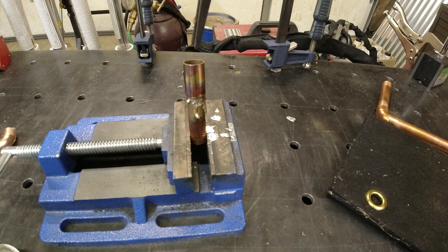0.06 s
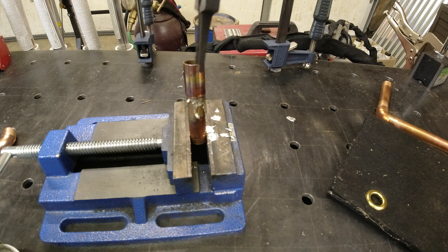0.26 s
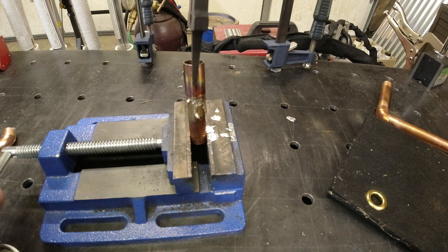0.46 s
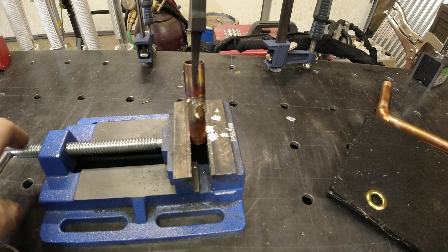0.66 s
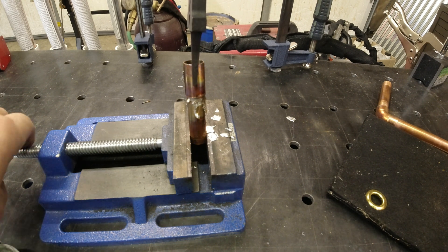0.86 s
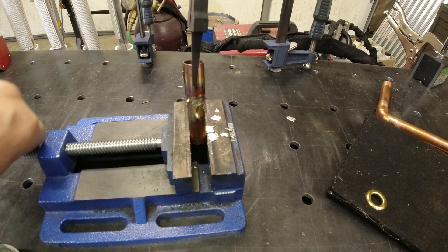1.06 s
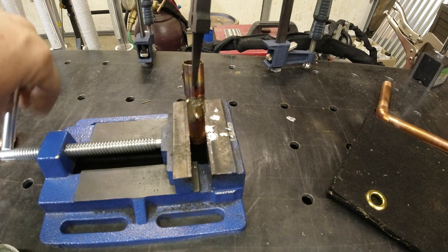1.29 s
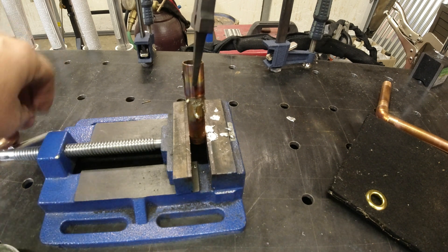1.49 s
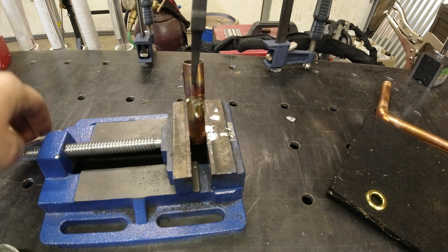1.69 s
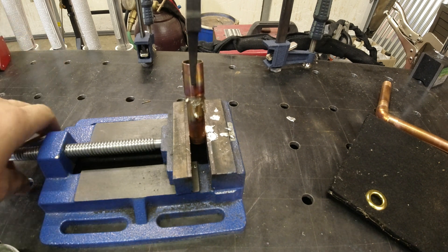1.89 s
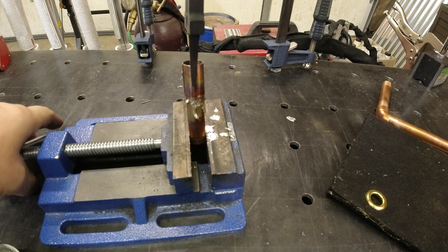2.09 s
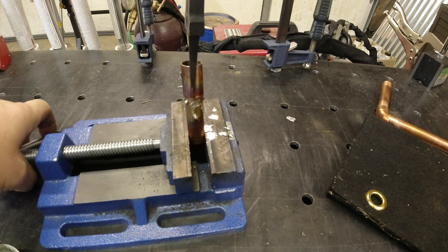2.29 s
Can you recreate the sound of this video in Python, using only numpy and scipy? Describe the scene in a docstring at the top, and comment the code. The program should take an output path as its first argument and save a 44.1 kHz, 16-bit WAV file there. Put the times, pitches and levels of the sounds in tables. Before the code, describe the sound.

One loud metal clank from a vise handle, amid faint rubbing and taps.

```python
"""A small steel vise is tightened in a workshop, heard by one microphone just above the bench. A deep rumble
swells and fades beneath it all, and the hand finds the handle with a tick. The screw rubs as it turns and
knocks twice near one second. At 1.56 s the sliding handle drops against its stop with one loud clank that rings
in the vise, thumps the bench and fills the room. More rubbing and two light taps follow as the ring dies."""
import sys
import numpy as np
from scipy import signal
from scipy.fft import rfft, irfft
from scipy.io import wavfile
from scipy.ndimage import uniform_filter1d

SR = 44100
rng = np.random.default_rng(int(sys.argv[2]) if len(sys.argv) > 2 else 0)


def put_to_file(sound):
    """Save the sound as 16-bit audio at rate SR, in the file named by the first command-line argument."""
    columns = np.atleast_2d(sound).T  # one column per channel
    safe = np.clip(columns, -1, 1)
    whole_steps = np.round(safe * 32767)
    wavfile.write(sys.argv[1], SR, whole_steps.astype(np.int16))


N = 108045

# modes of the bench: (frequency [Hz], relative level [dB], t60 [s])
BENCH_MODES = [(83, 1, .45), (134, -4, .35), (229, -2, .3), (326, -5, .26), (474, -2, .26)]
# colour of a blow's wash in the workshop: (frequency [Hz], relative level [dB])
WASH_COLOUR = [(100, -7.5), (300, -7), (700, -6.5), (1250, -5.5), (1600, -0.5), (2100, -3), (2800, -3.5),
               (4000, -4), (5600, -4), (7500, -7), (10000, -14.5), (12000, -29), (16000, -30.5)]
# colour of the hiss, alone and in rubs and taps: (frequency [Hz], relative level [dB])
HISS_COLOUR = [(500, 2), (1600, 0), (3000, -1), (6300, -1), (8500, -10.5), (12000, -19.5)]


def from_db(db):
    """Decibels to gain."""
    return 10 ** (np.asarray(db) / 20)


def unit_power(x):
    """Scale to a mean square of one."""
    return x / np.sqrt(np.mean(x ** 2) + 1e-20)


def since(start):
    """Seconds since a moment, zero before it."""
    return np.maximum(np.arange(N) / SR - start, 0)


def glide(levels, smooth_s=.04):
    """Gain that follows rows of (time [s], level [dB]), with rounded corners."""
    db = np.interp(since(0), *np.transpose(levels))
    return from_db(uniform_filter1d(db, size=int(smooth_s * SR)))


def at_hz(table, hz):
    """Read a table on a log-frequency axis."""
    freqs, values = np.transpose(table)
    return np.interp(np.log(np.maximum(hz, 1)), np.log(freqs), values)


def noise(colour, peaks=None):
    """Steady coloured noise of unit power, with optional peaks (centre [Hz], width [Hz], level [dB])."""
    hz = np.arange(N // 2 + 1) * SR / N
    gain = from_db(at_hz(colour, hz))
    if peaks is not None:
        power = sum(from_db(db) ** 2 / (1 + ((hz - centre) / width * 2) ** 2) ** 2
                    for centre, width, db in peaks)
        gain = gain * np.sqrt(power)
    return unit_power(irfft(rfft(rng.standard_normal(N)) * gain, N))


def fade(t, t60):
    """Exponential decay, 60 dB down after t60 seconds."""
    return np.exp(-np.minimum(np.log(1000) * t / t60, 60))


def blow(start, rise, t60):
    """Envelope of a blow: quick rise, then decay."""
    return (1 - np.exp(-since(start) / rise)) * fade(since(start), t60)


def stroke(start, rise, t60):
    """Envelope of a sliding motion: it swells, then dies."""
    return np.minimum(since(start) / rise, 1) ** 2.35 * fade(since(start + rise), t60)


def ring(start, modes):
    """Modes struck at one moment, each swinging up or down first."""
    t = since(start)
    return sum(from_db(db) * rng.choice([-1, 1]) * np.sin(2 * np.pi * hz * t) * fade(t, t60)
               for hz, db, t60 in modes)


def room_tone():
    """The air of the workshop and a faint hiss, behind everything else."""
    # colour of the air: (frequency [Hz], relative level [dB])
    air_colour = [(30, 6), (120, 5), (200, -7), (500, -7.5), (800, -12.5), (1600, -17), (3000, -27.5),
                  (6000, -36), (10000, -37), (15000, -48)]
    # course of the air and of the hiss: (time [s], level [dB])
    air_levels = [(0, -60), (.28, -60), (.38, -67.5), (.62, -64), (.9, -63.5), (1.3, -64.5), (1.5, -64.5),
                  (2.05, -64.5), (2.45, -61)]
    hiss_levels = [(0, -70.5), (.12, -83.5), (.38, -81.5), (.6, -73.5), (.9, -78.5), (1.3, -82.5),
                   (2.45, -89)]
    return glide(air_levels) * noise(air_colour) + glide(hiss_levels) * noise(HISS_COLOUR)


def room_wash(steady_noise, start):
    """A noise builds up from one moment and dies band by band as the workshop does."""
    # decay of the workshop: (frequency [Hz], t60 [s])
    room_t60 = [(100, 0.27), (500, 0.45), (1500, 0.42), (3000, 0.4), (6000, 0.38), (9000, 0.29),
                (15000, .29)]
    centres = np.geomspace(60, 16000, 12)
    hz = np.arange(N // 2 + 1) * SR / N
    spectrum = rfft(steady_noise)
    out = 0
    for centre, share in zip(centres, np.eye(len(centres))):
        band = irfft(spectrum * at_hz(np.c_[centres, share], hz), N)
        out += band * blow(start, rise=0.024, t60=at_hz(room_t60, centre))
    return out


def bench_rumble(drone_width_hz=6.2):
    """Under the microphone a deep rumble swells and fades, and the bench drones at its lowest mode."""
    # colour of the rumble: (frequency [Hz], relative level [dB])
    rumble_colour = [(4, -5), (8, 12.5), (14, 0.5), (25, -12.5), (40, -15.5), (60, -34.5), (85, -35.5),
                     (120, -47), (200, -58), (400, -100)]
    # course of the rumble and of the drone: (time [s], level [dB])
    rumble_levels = [(0, -61.5), (.2, -49), (.29, -14.5), (.42, -28), (.6, -20.5), (.72, -24.5), (.90, -13),
                     (1.12, -24.5), (1.25, -36), (1.43, -24.5), (1.62, -30.5), (1.78, -38.5), (1.86, -43.5),
                     (2.1, -57), (2.45, -47)]
    drone_levels = [(0, -62), (.25, -65), (.48, -53), (.55, -36.5), (.63, -64), (.8, -49), (1.0, -57.5),
                    (1.15, -54), (1.43, -55.5), (1.55, -62.5), (2.05, -72.5), (2.16, -66), (2.45, -75)]
    lowest_hz = BENCH_MODES[0][0]
    resonance = signal.iirpeak(lowest_hz, lowest_hz / drone_width_hz, fs=SR)
    drone = unit_power(signal.lfilter(*resonance, noise([(100, 0), (400, -40)])))
    return glide(rumble_levels) * noise(rumble_colour) + glide(drone_levels) * drone


def bench_bump(start, db, cut_hz=170):
    """A light blow stirs the upper modes of the bench more than the lowest."""
    low_cut = signal.butter(2, cut_hz, "high", fs=SR, output="sos")
    return from_db(db) * signal.sosfilt(low_cut, ring(start, BENCH_MODES))


def rubs(grain_db=-2.0, grain_hz=150):
    """Hand, screw and sliding handle rub in strokes, with an uneven grain."""
    # strokes: (time [s], rise [s], release t60 [s], groan [dB], scrape [dB], hiss [dB])
    strokes = [(0.188, 0.043, 0.36, -77, -75, -67.5), (0.438, 0.062, 0.49, -46.5, -62.5, -76),
               (.50, 0.062, .33, -49, -63.5, -96), (1.118, 0.045, .35, -51, -63.5, -62),
               (1.22, .17, .9, -62.5, -88, -98), (1.734, 0.037, 0.34, -55.5, -47.5, -68),
               (1.888, 0.029, 0.31, -62.5, -58, -69), (2.068, 0.035, .35, -61, -55.5, -72),
               (2.33, 0.068, 1, -50.5, -61.5, -66), (2.391, 0.063, .4, -43.5, -57.5, -71)]
    # colours of the dull groan and the bright scrape: (frequency [Hz], relative level [dB])
    groan_colour = [(60, -2.5), (130, 10), (230, 6.5), (520, 2), (700, -5), (930, -6.5), (1300, -24.5),
                    (3000, -50.5), (6500, -38), (14000, -70)]
    scrape_colour = [(200, -19), (1250, -10), (1450, 0.5), (1780, 5), (2050, -11.5), (2500, -6.5),
                     (4000, -20.5), (6000, -29.5), (9000, -32), (14000, -47)]
    out = 0
    for start, rise, t60, groan_db, scrape_db, hiss_db in strokes:
        groan = from_db(groan_db) * noise(groan_colour)
        scrape = from_db(scrape_db) * noise(scrape_colour)
        hiss = from_db(hiss_db) * noise(HISS_COLOUR)
        out += stroke(start, rise, t60) * (groan + scrape + hiss)
    grain = noise([(grain_hz, 0), (2 * grain_hz, -60)])
    return out * from_db(grain_db * grain)


def handle_taps(click_db=-10, rise_s=0.0011):
    """Light contacts click, stir one region of the handle's resonances and bump the bench below."""
    # taps: (time [s], level [dB], centre [Hz], width [octaves], relative after-ring [dB], bench [dB])
    taps = [(0.4536, -42.5, 6760, 2.2, -17, -54.5), (.563, -50.5, 1850, .9, -20, -48.5),
            (1.160, -39.5, 3520, 0.94, -20.5, -49.5), (1.298, -70, 900, 1.0, -20, -58.5),
            (1.388, -57, 1500, .5, -20, -58), (2.113, -53, 3500, 1.0, -31, -59.5),
            (2.260, -59.5, 1300, .6, -19.5, -59)]
    # resonances of the lightly touched handle: (frequency [Hz], width [Hz], relative level [dB])
    handle_peaks = [(1560, 200, 0), (2280, 200, -7), (3160, 170, -4), (4380, 200, -7), (4680, 200, 3),
                    (5500, 450, 0), (6200, 400, -3), (8720, 200, -5), (9850, 200, -13)]
    hz = np.geomspace(100, 16000, 40)
    out = 0
    for start, db, centre, width, ring_db, bench_db in taps:
        region_db = -20 * np.log10(1 + (np.log2(hz / centre) / width) ** 4)
        tick = noise(np.c_[hz, region_db], handle_peaks) + from_db(click_db) * noise(HISS_COLOUR)
        envelope = blow(start, rise_s, t60=.016) + from_db(ring_db) * blow(start, rise_s, t60=.3)
        out += from_db(db) * tick * envelope + bench_bump(start, bench_db)
    return out


def screw_knocks(rise_s=0.0034, wash_width_hz=45):
    """The screw takes up its play softly: a dull thud, a short ring and a little wash in the room."""
    # knocks: (time [s], level [dB], bench [dB])
    knocks = [(.957, -40, -34), (0.996, -53, -39.5)]
    # modes of the screw: (frequency [Hz], relative level [dB], t60 [s])
    screw_modes = [(392, 6, .15), (502, 1.5, 0.13), (716, -18.5, 0.3), (1440, -2.5, 0.065),
                   (1517, -6.5, 0.093), (1780, -13.5, .13), (2390, -9.5, 0.13), (3090, -10.5, 0.11),
                   (3195, -2.5, 0.059), (6620, -14, 0.041)]
    # colour of the thud: (frequency [Hz], relative level [dB])
    thud_colour = [(100, 11), (180, 8), (500, 8), (700, -8.5), (1300, -9), (3000, -21), (4200, -41),
                   (6400, -27), (10000, -49)]
    wash_peaks = [(hz, wash_width_hz, db) for hz, db, _ in screw_modes]
    out = 0
    for start, db, bench_db in knocks:
        steel = ring(start, screw_modes)
        thud = from_db(6) * noise(thud_colour) * fade(since(start), t60=0.17)
        wash = from_db(-17.5) * noise(WASH_COLOUR, wash_peaks) * blow(start, rise=0.024, t60=0.41)
        onset = 1 - np.exp(-since(start) / rise_s)
        out += (from_db(db) * (steel + thud) + bench_bump(start, bench_db)) * onset
        out += from_db(db) * wash
    return out


def handle_clank(start=1.560, crack_width_hz=190, wash_width_hz=45):
    """Close up, the handle hits its stop: steel cracks and rings, the bench thumps, the room answers."""
    # colour of the crack, the dense first ring of the steel: (frequency [Hz], relative level [dB])
    crack_colour = [(100, -28), (300, -14.5), (700, -6.5), (1200, -10.5), (1500, -4.5), (3000, -3),
                    (4100, -2.5), (5500, 0), (7200, -7), (9500, -4), (11000, -12.5), (12000, -22.5),
                    (16000, -24)]
    # modes of the vise, many in close pairs: (frequency [Hz], relative level [dB])
    vise_modes = [(1423, 1), (1666, -2), (1763, -5), (1865, -8), (2463, -4), (2535, 0), (2614, -4),
                  (3200, -3), (3475, -3), (3743, -2), (4613, -3), (4703, -3), (4784, -3), (5213, 1),
                  (5391, -3), (5838, 1), (6190, -3), (6335, -2), (7855, -3), (8443, -10), (9453, -6),
                  (9563, -5), (10830, -7)]
    # faint long ring of the loose handle bar: (frequency [Hz], relative level [dB], t60 [s])
    bar_modes = [(1039, -2, 1.6), (1750, 6, .7), (2283, -4, .9), (3479, 4, .7), (4580, -4, .9),
                 (5430, -5, .9), (5545, -6, 1.0), (5663, -5, .9), (8480, -10, .7), (8840, -12, .8),
                 (10230, -16, .8)]
    # part of the crack and of the wash gathers round the vise's modes
    crack_peaks = [(hz, crack_width_hz, db) for hz, db in vise_modes]
    wash_peaks = [(hz, wash_width_hz, db) for hz, db in vise_modes]
    crack = from_db(-11.5) * noise(crack_colour) + from_db(-11) * noise(crack_colour, crack_peaks)
    crack *= blow(start, rise=0.0017, t60=0.047)
    # t60 is 0.27 s at 3 kHz; higher modes die sooner
    damped_modes = [(hz, db, 0.27 * (3000 / hz) ** 0.18) for hz, db in vise_modes]
    vise = from_db(-33) * ring(start, damped_modes)
    bar = from_db(-53) * ring(start, bar_modes)
    thump = from_db(-35) * ring(start, BENCH_MODES)
    shimmer = from_db(-24) * noise(WASH_COLOUR, wash_peaks)
    wash = room_wash(from_db(-19.5) * noise(WASH_COLOUR) + shimmer, start)
    return crack + vise + bar + thump + wash


def scene():
    """The workshop in mono, from just above the bench."""
    background = bench_rumble() + room_tone()
    return (background + handle_clank() + handle_taps() + screw_knocks() + rubs())[None]


def record(dry, cutoff_hz=15750):
    """The top of the microphone's signal is cut steeply."""
    return signal.sosfilt(signal.ellip(10, .1, 80, cutoff_hz, fs=SR, output="sos"), dry)


dry = scene()
out = record(dry)
put_to_file(out)
```